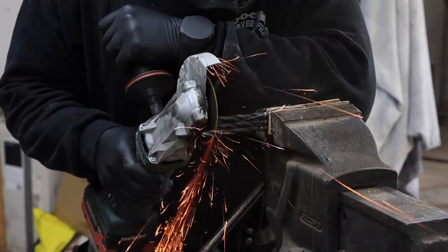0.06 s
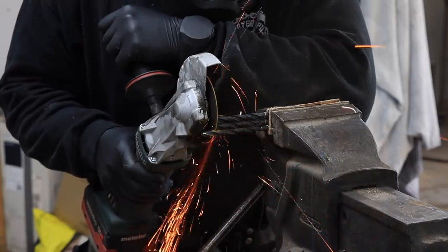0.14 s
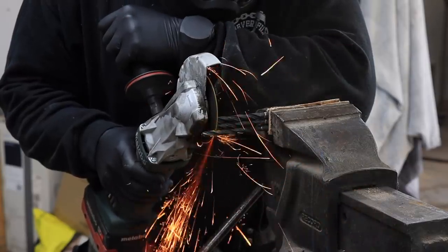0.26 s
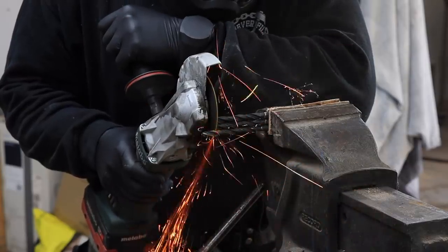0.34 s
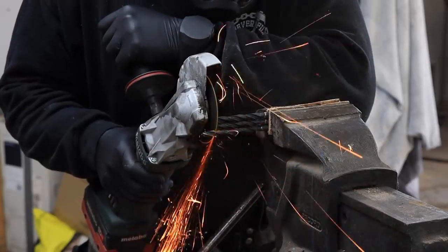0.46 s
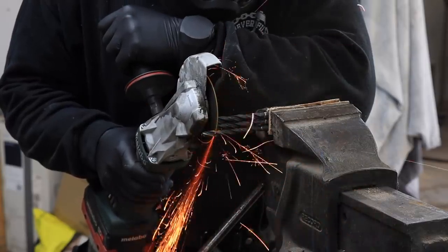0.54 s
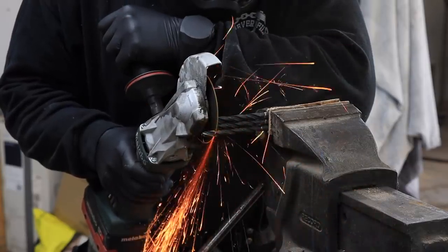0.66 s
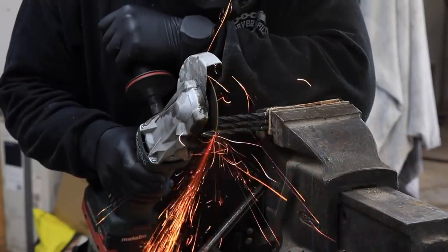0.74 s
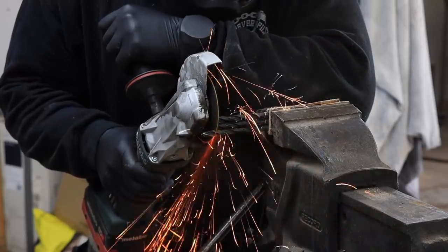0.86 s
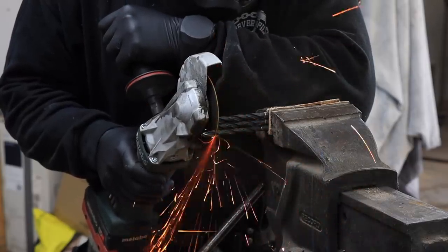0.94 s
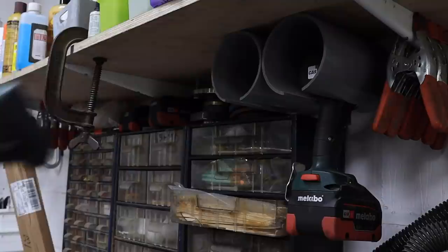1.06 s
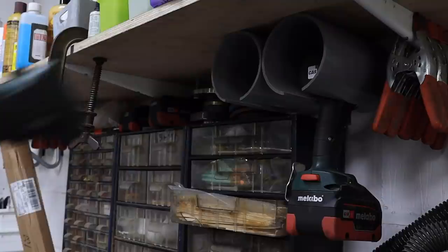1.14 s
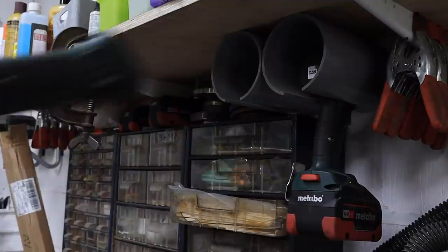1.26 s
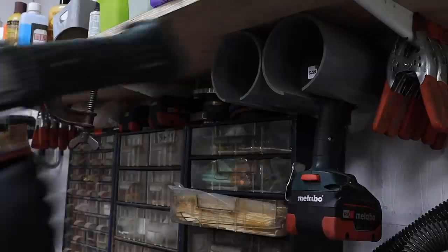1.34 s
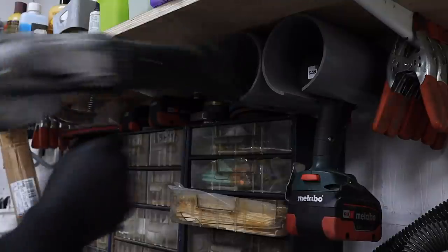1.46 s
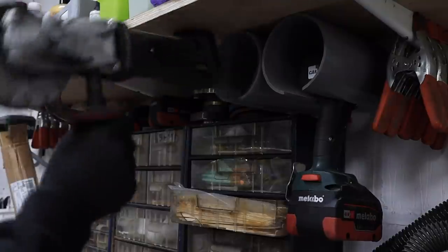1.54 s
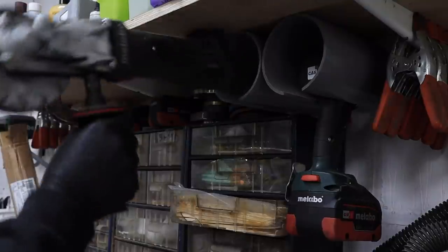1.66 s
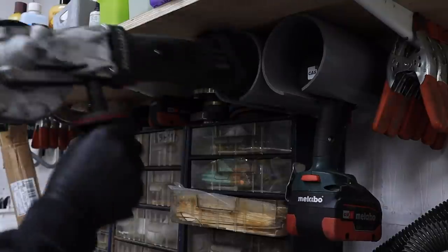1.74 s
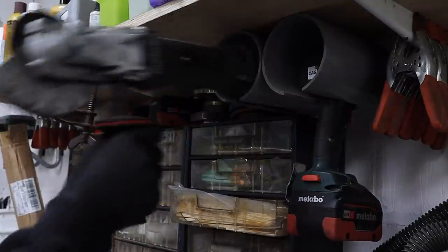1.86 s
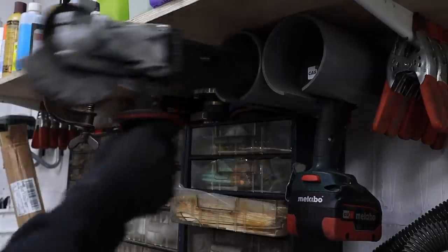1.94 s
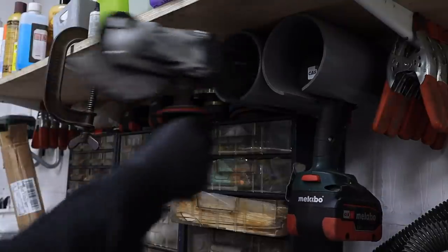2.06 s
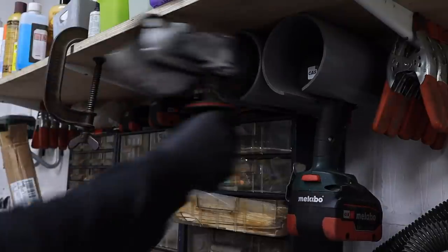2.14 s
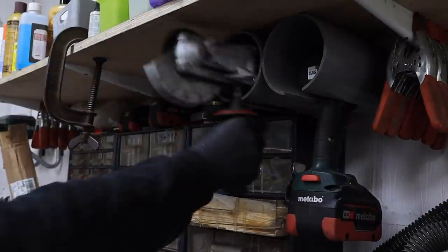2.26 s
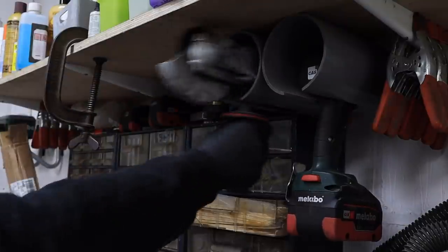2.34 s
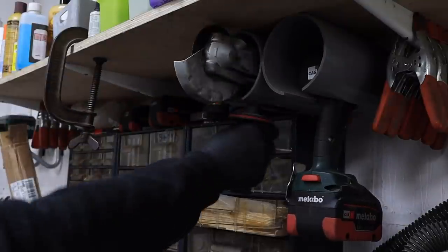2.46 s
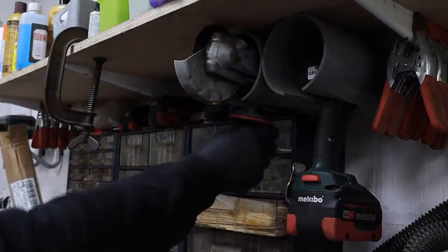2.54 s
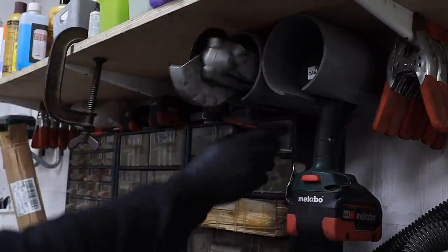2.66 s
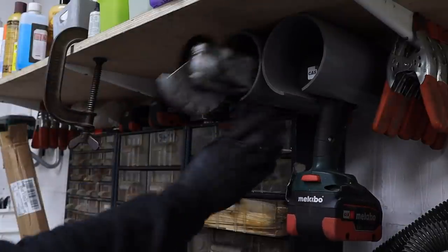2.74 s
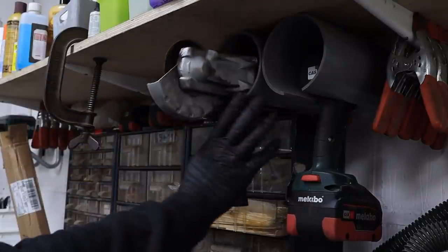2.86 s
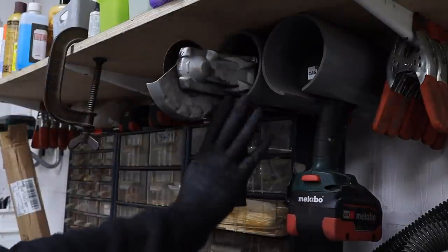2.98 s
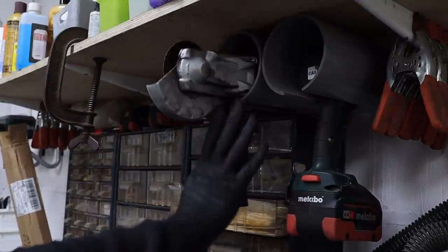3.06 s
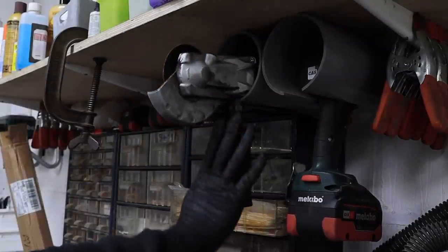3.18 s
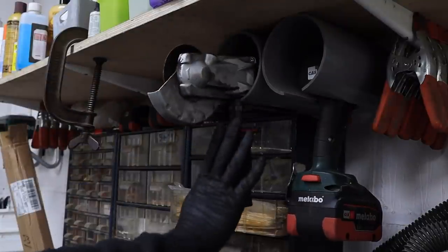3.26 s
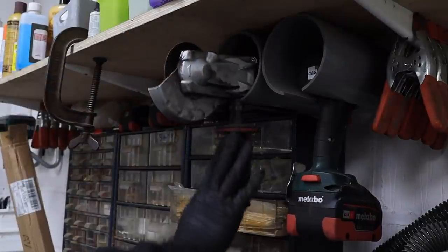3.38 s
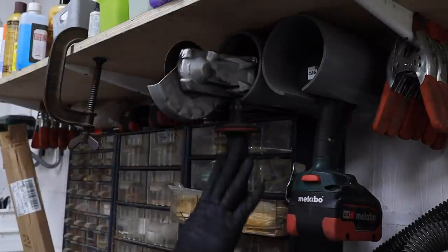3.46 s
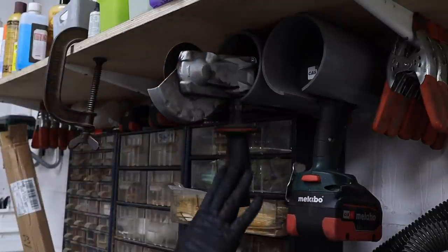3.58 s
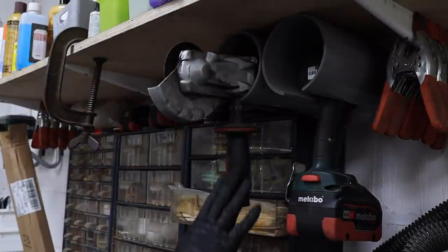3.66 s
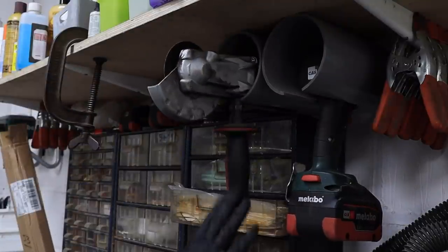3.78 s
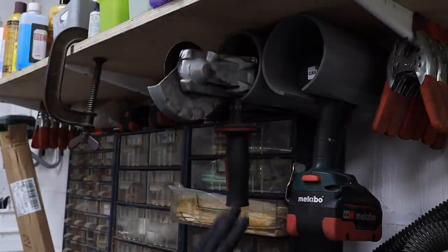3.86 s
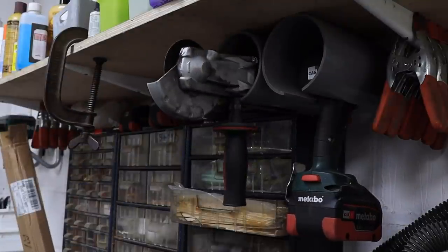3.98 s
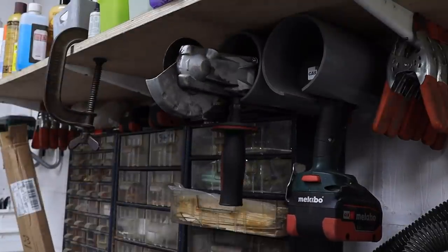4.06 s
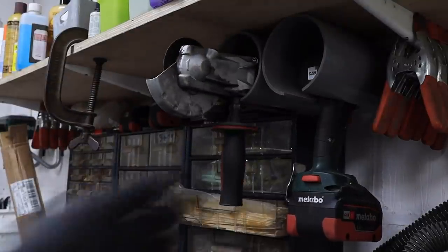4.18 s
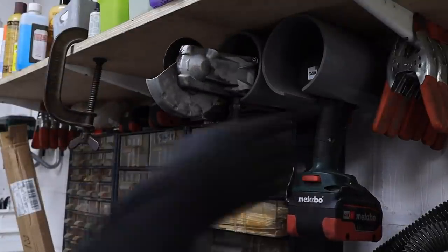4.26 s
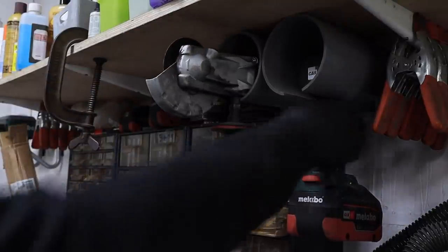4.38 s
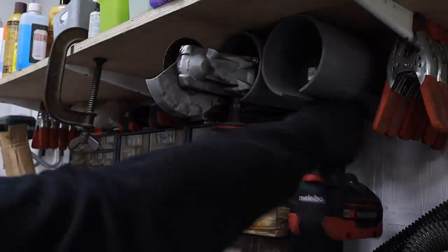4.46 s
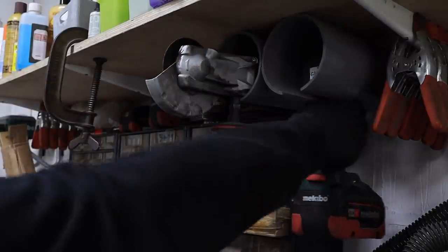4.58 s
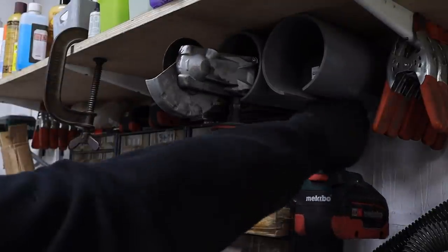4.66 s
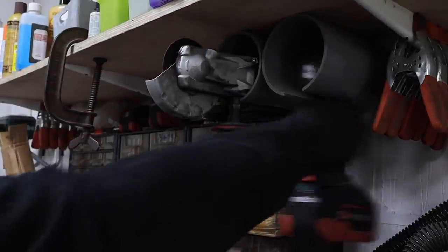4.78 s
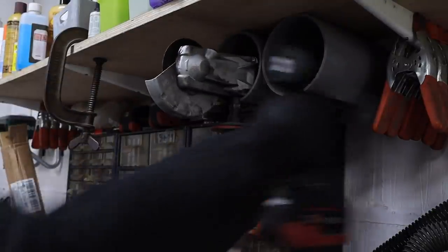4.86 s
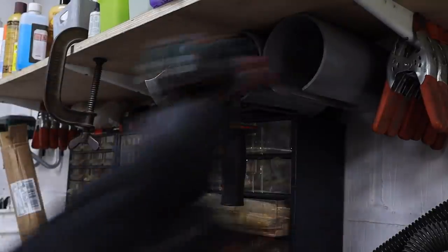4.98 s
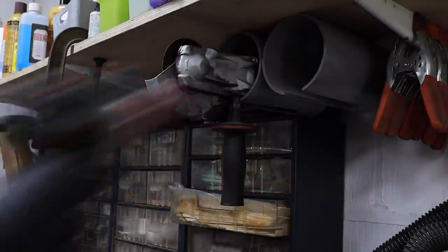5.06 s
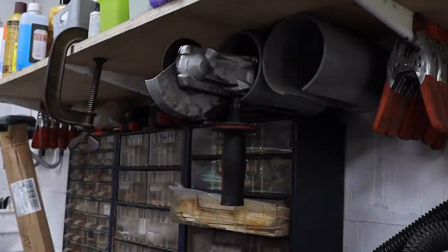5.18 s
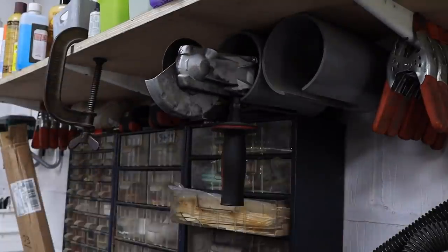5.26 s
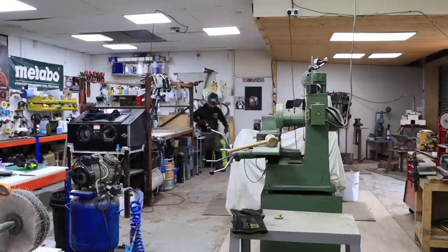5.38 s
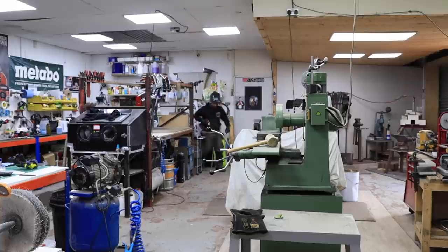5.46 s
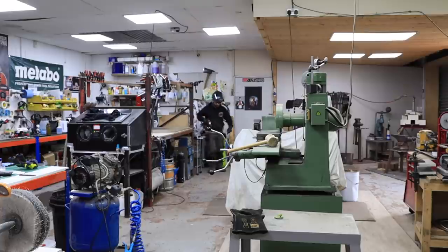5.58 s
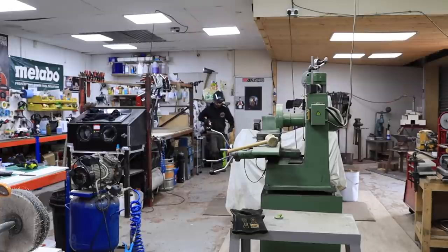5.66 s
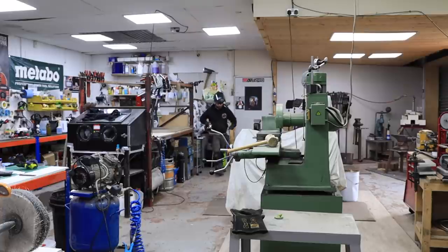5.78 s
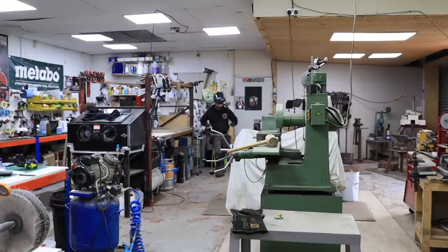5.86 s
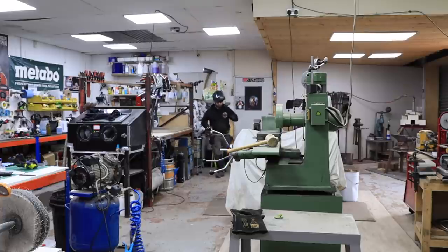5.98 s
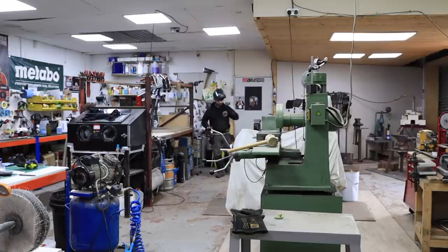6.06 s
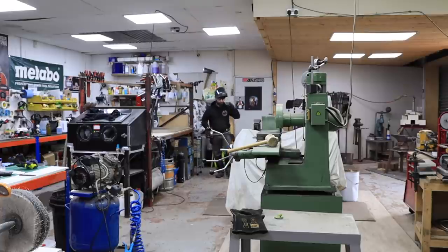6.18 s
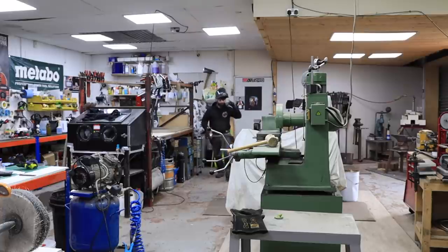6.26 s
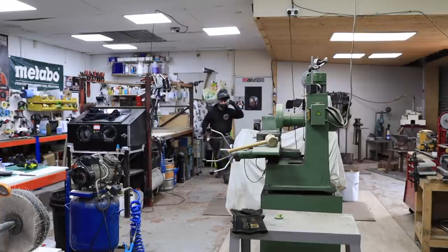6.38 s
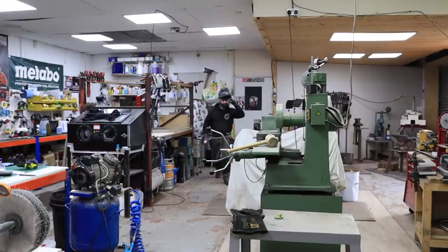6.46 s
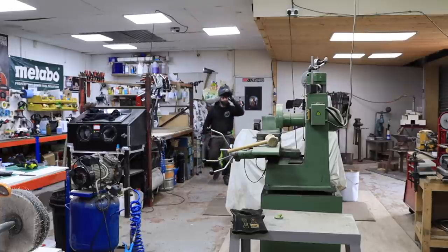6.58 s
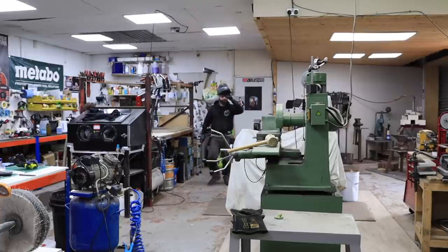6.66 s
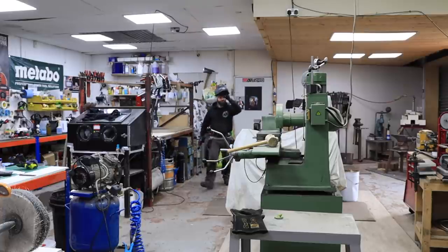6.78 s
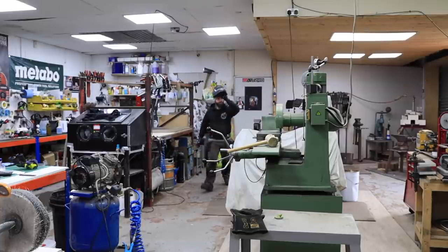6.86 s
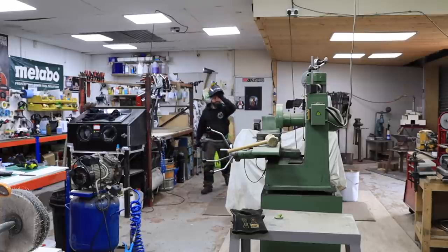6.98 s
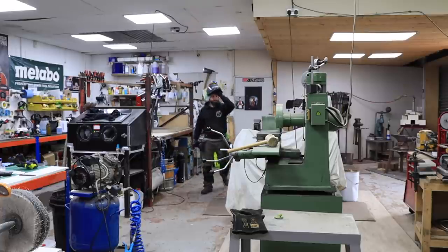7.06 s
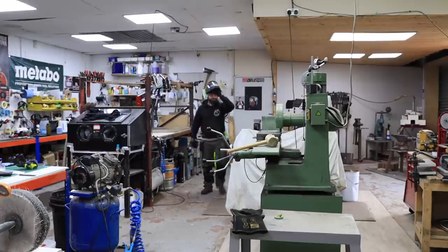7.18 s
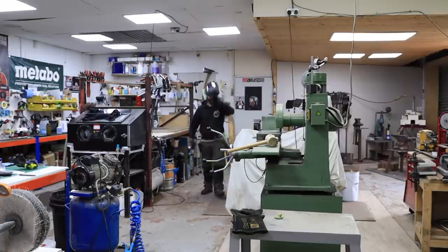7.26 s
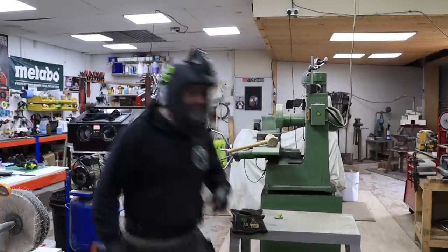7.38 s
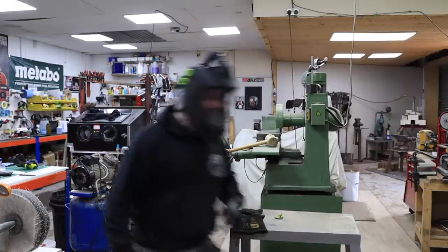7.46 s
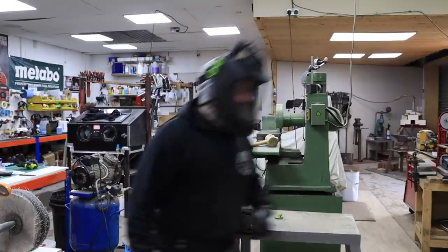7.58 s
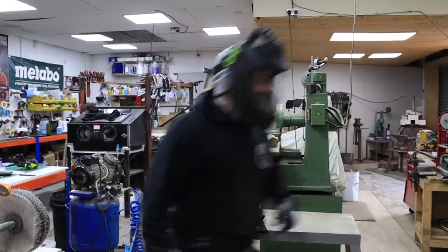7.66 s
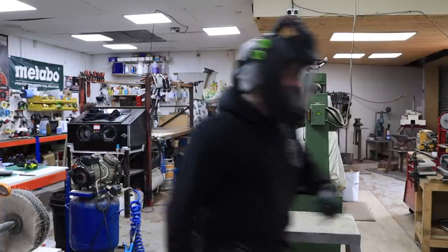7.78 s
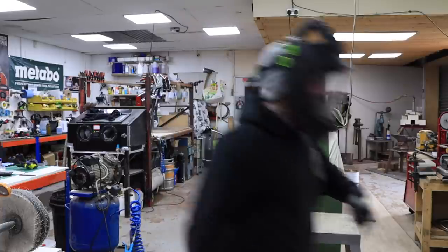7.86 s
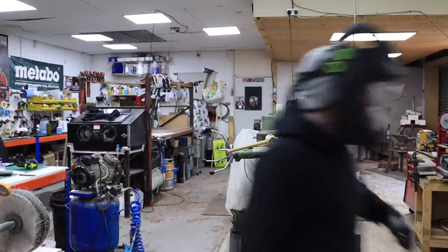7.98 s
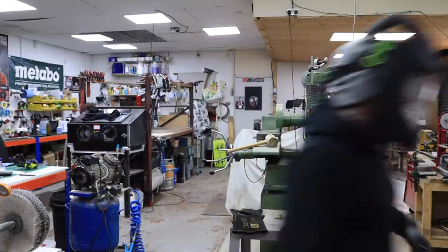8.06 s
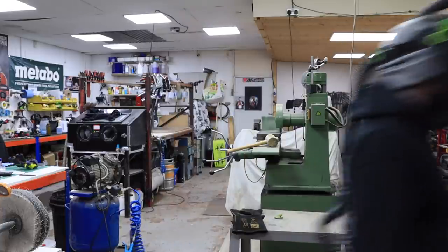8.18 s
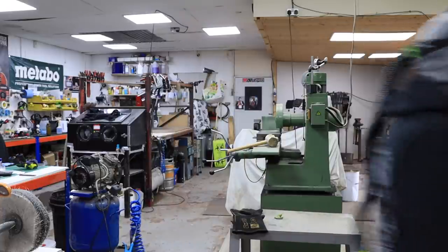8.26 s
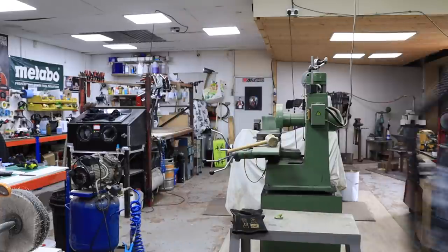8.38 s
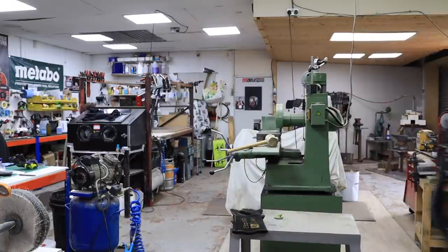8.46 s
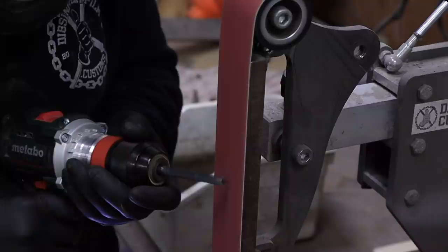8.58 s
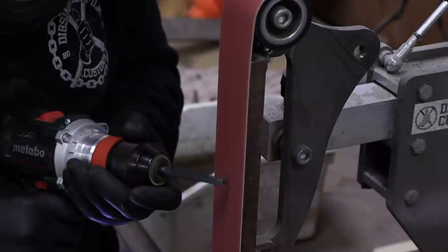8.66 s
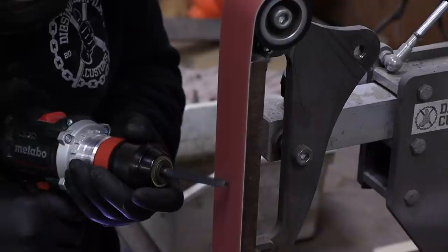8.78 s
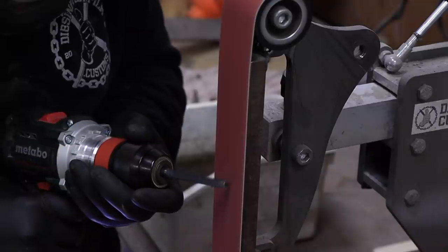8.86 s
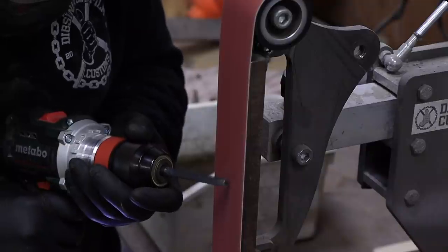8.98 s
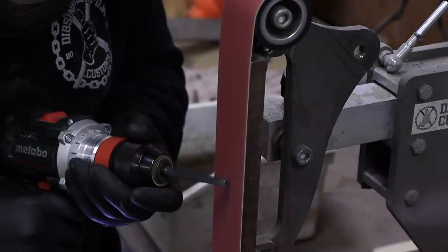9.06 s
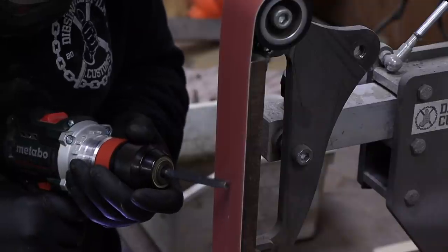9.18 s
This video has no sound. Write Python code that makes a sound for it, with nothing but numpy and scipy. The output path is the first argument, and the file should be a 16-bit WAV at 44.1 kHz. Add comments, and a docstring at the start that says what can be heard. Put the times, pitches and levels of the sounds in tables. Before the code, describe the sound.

Harsh metal cutting, abrupt cut to tools clattering into hollow plastic holsters, soft steps in a quiet workshop, then sudden belt grinder roar and buzzing contact.

```python
"""A cordless angle grinder cuts a steel bar: noise that repeats with each turn is filtered, over gear tones.
The cut ends abruptly; the tool is shoved into a plastic pipe holster under a shelf and a drill is knocked
about and pulled from the next one: noise bursts and scrapes, with decaying pipe and shelf modes.
Someone crosses the quiet workshop: shaped noise for cloth and shoes, sine modes for metal clinks.
A belt grinder then starts abruptly, steady noise and whines, and a drill bit chatters against the belt."""
import sys
import numpy as np
from scipy import signal
from scipy.fft import rfft, irfft
from scipy.io import wavfile
from scipy.ndimage import uniform_filter1d, map_coordinates

SR = 44100
rng = np.random.default_rng(int(sys.argv[2]) if len(sys.argv) > 2 else 0)


def wav_out(sig):
    """Save sig, one row per channel (or a flat mono array), as 16-bit PCM at SR to the path in sys.argv[1]."""
    wavfile.write(sys.argv[1], SR, np.round(np.clip(np.atleast_2d(sig).T, -1, 1) * 32767).astype(np.int16))


N = 406602
T = np.arange(N) / SR

CUT_END_S, BELT_START_S, TOUCH_S = 1.094, 8.612, 8.826

# modes of pipe and shelf: (frequency [Hz], relative level [dB], decay time t60 [s])
HOLSTER_MODES = [(188, -6.5, 0.3), (208, -4, 0.48), (247.4, -4, 0.24), (291.7, -2.5, 0.1),
                 (401, -5.5, 0.22), (445, -3.5, 0.22), (561, -7.5, 0.035), (621, -4, .25),
                 (780, -4.5, 0.095), (950, -3.5, 0.13), (1280, -5.5, 0.22), (1575, -3.5, 0.11),
                 (2060, -7.5, 0.13), (2365, -11.5, 0.15), (3360, -7, .08), (3725, -6.5, .07)]


def undb(db):
    """Level definition: decibels become an amplitude gain."""
    return 10 ** (np.asarray(db) / 20)


def unit(x):
    """Power normalisation: scale to rms 1."""
    return x / np.sqrt(np.mean(x ** 2))


def noise():
    """White noise: equal mean power at all frequencies."""
    return rng.standard_normal(N)


def curve(table):
    """Linear interpolation of (time, value) points."""
    s, value = np.transpose(table)
    return np.interp(T, s, value)


def during(start, end, fade):
    """Linear gating: 1 between two moments, with straight fades inside."""
    return np.clip(np.minimum(T - start, end - T) / fade, 0, 1)


def walk(rate):
    """Low-pass random fluctuation with a spread near 1."""
    k = int(SR / rate)
    held = np.repeat(rng.standard_normal(N // k + 1), k)
    return 1.2 * uniform_filter1d(held, k)[:N]


def colour(x, spectrum):
    """Minimum-phase filtering through (Hz, dB) points; white noise keeps its power."""
    size = 4096
    hz, db = np.transpose(spectrum)
    bins_hz = np.arange(size // 2 + 1) * SR / size
    gain = unit(undb(np.interp(np.log(bins_hz + 1), np.log(hz), db)))
    # folding the cepstrum onto positive times makes the filter causal
    cepstrum = irfft(np.log(gain))
    cepstrum[1:size // 2] *= 2
    cepstrum[size // 2 + 1:] = 0
    impulse_response = irfft(np.exp(rfft(cepstrum)))
    return signal.oaconvolve(x, impulse_response)[:len(x)]


def band(x, lo_hz, hi_hz, order=2):
    """Butterworth band-pass; order 1 is a single resonance."""
    edges_hz = [max(lo_hz, 10), min(hi_hz, SR / 2.1)]
    sos = signal.butter(order, edges_hz, "band", fs=SR, output="sos")
    return signal.sosfilt(sos, x + 1e-18)


def resonate(x, peaks):
    """Parallel resonances (Hz, width Hz, dB) driven by one source, at rms 1."""
    return unit(sum(undb(db) * band(x, hz - width / 2, hz + width / 2, order=1) for hz, width, db in peaks))


def ring(modes):
    """Modal impulse response: (Hz, dB, t60) sines of random polarity that decay exponentially."""
    t = T[:SR]
    return sum(undb(db - 60 * t / t60) * np.sin(2 * np.pi * hz * t) * rng.choice([-1, 1])
               for hz, db, t60 in modes)


def struck(taps, modes):
    """Impulse excitation: clean (s, dB) taps set an object's modes ringing."""
    hits = np.zeros(N)
    for s, db in taps:
        hits[int(s * SR)] = undb(db)
    return signal.oaconvolve(hits, ring(modes))[:N]


def bursts(times, dbs, t60, contact_s=.005, attack_s=0.00083):
    """Rough contact: noise starts fast, holds while the parts touch, then decays exponentially."""
    power = np.zeros(N)
    t = T[:SR // 2]
    shape = np.minimum(t / attack_s, 1) ** 2 * undb(-60 * np.maximum(t - contact_s, 0) / t60)
    for s, db in zip(times, dbs):
        part = power[int(s * SR):][:len(t)]
        part += (undb(db) * shape[:len(part)]) ** 2
    return np.sqrt(power) * noise()


def grains(rate, spread_db):
    """Granular friction: dense random clicks of very unequal size, at rms 1."""
    present = rng.random(N) < rate / SR
    size_db = spread_db * np.minimum(rng.exponential(size=N), 5)
    return unit(noise() * present * undb(size_db))


def strokes(table, edge_s=0.0094):
    """Envelope of short rubs (s, length, dB, fade dB), each changing linearly in dB."""
    return sum(undb(db - fade_db * np.clip((T - s) / length, 0, 1)) * during(s, s + length, edge_s)
               for s, length, db, fade_db in table)


def swells(table, rise, depth_db):
    """Envelope of movements (s, length, dB): exponential growth and decay, added in power."""
    power = 0
    for s, length, db in table:
        distance = np.maximum((s - T) / rise, T - s) / length
        power = power + undb(db - depth_db * np.minimum(distance, 10)) ** 2
    return np.sqrt(power)


def wheel_face(turns, keep, count=448):
    """Quasi-periodic excitation: the same grains pass each turn, while a share wears away."""
    fresh = rng.standard_normal((int(turns[-1]) + 22, count))
    face = signal.lfilter([1], [1, -keep], fresh, axis=0)
    return unit(map_coordinates(face.ravel(), [(turns + 20) * count], order=3))


def gear_whine(turns, load):
    """Harmonics of rotation: gear and fan tones keep whole multiples of the wheel speed."""
    # (multiple of wheel speed, unloaded level [dB], change at full load [dB])
    gears = [(5, -42, -10), (11, -38.5, -3), (12, -40, -12), (25, -32.5, -5), (26, -37, -3), (27, -45, 11),
             (30, -36, -8), (31, -32, -2), (32, -34.5, -4), (36, -27, -9), (37, -29.5, -9), (39, -31, -12),
             (40, -39, 9), (41, -34, 7), (42, -34.5, -1), (48, -48, 13), (49, -33.5, -13), (51, -38, -6),
             (53, -37, -9)]
    whine = 0
    for multiple, db, load_db in gears:
        gain = undb(db + load_db * load + 3.1 * walk(24)) * np.sqrt(2)
        whine = whine + gain * np.sin(2 * np.pi * (multiple * turns + rng.random()))
    return whine


def angle_grinder():
    """Abrasive excitation: grains scratch the bar, steel and guard resonate, and gears sag under load."""
    # rotation: (time [s], wheel speed [turns per s])
    wheel_speed = [(0.0, 97.5), (0.18, 97.5), (0.424, 96.6), (0.682, 93.9), (0.83, 92.7), (1.058, 94.5),
                   (1.08, 94.2)]
    # how hard the wheel is fed into the bar: (time [s], level [dB])
    feed = [(0, 1), (.22, -0.8), (.38, 1), (.7, -1.5), (.88, -0.2), (1.04, 0)]
    # ringing steel: (frequency [Hz], relative spectral density [dB])
    steel_spectrum = [(100, -47), (200, -31), (300, -28.5), (450, -22), (600, -21), (880, -19),
                      (1080, -8.5), (1400, -17), (2000, -9), (2750, -11), (3530, 1), (4000, -2.5),
                      (4300, -10), (5000, -10), (6500, -28.5), (8500, -55.5)]
    # guard resonances: (frequency [Hz], width [Hz], relative level [dB])
    guard_peaks = [(1056, 40, -10.5), (2457, 51, 0.5), (3000, 53, -4), (3550, 100, -4), (3646, 43, -8),
                   (4960, 23, -2.5), (4860, 20, -11)]
    # wheel's side in the slot: (frequency [Hz], relative spectral density [dB])
    rasp_spectrum = [(1060, -41), (1800, -20.5), (2500, -13), (2680, -8), (2820, -6.5), (3100, -3.5),
                     (3300, -3.5), (3600, -4.5), (4420, -27), (7480, -120)]
    # grit hiss: (frequency [Hz], relative spectral density [dB])
    grit_spectrum = [(4000, -32), (5500, -2), (6200, -7), (7800, -3), (8700, -10.5), (9300, -6.5),
                     (9900, 3), (11300, -4.5), (12400, 3), (12900, -3.5), (13500, 1), (14400, -1),
                     (15200, -0.5), (15800, -6)]
    # levels at a feed of 0 dB; dB of hiss per dB of feed
    base_steel_db, base_grit_db, grit_per_feed = -17.5, -21.5, 0.8
    # the side of the wheel always rubs, and binds once as the slot deepens
    rub_db, bind_db, bind_s, bind_width_s = -31, -16, 0.97, 0.044
    # the wheel is eased off: the hiss falls most, the steel rings on
    lift_s, lift_length_s, lift_grit_db, lift_steel_db = 1.054, .022, -12, -5

    speed = curve(wheel_speed)
    load = (speed.max() - speed) / np.ptp(speed)  # 0 at full speed, 1 when slowest
    turns = np.cumsum(speed * (1 + 0.00077 * walk(30))) / SR
    feed_db = curve(feed)
    lift = np.clip((T - lift_s) / lift_length_s, 0, 1)
    steel_db = base_steel_db + feed_db + lift_steel_db * lift
    grit_db = base_grit_db + grit_per_feed * feed_db + lift_grit_db * lift
    binding = undb(rub_db) + undb(bind_db) * np.exp(-((T - bind_s) / bind_width_s) ** 2)
    runout = np.cos(2 * np.pi * turns)

    def scratch(keep, loose_db, throb_db):
        """Amplitude modulation by runout: grains fixed in the wheel plus chips that break loose."""
        contact = wheel_face(turns, keep) + undb(loose_db) * grains(9000, 0.71)
        return contact * undb(throb_db * runout + .8 * walk(70))

    steel = unit(colour(scratch(keep=.9, loose_db=-2.0, throb_db=-0.5), steel_spectrum))
    guard = undb(-9) * resonate(scratch(keep=.8, loose_db=-3, throb_db=-3.0), guard_peaks)
    rasp = unit(colour(scratch(keep=.85, loose_db=-5, throb_db=0.5), rasp_spectrum))
    hiss = unit(colour(scratch(keep=.85, loose_db=0, throb_db=1.5), grit_spectrum))
    cut = (steel + guard) * undb(steel_db) + rasp * binding + hiss * undb(grit_db)
    return (cut + gear_whine(turns, load)) * during(-1, CUT_END_S, .002)


def running_belt():
    """Broadband friction noise with tones: belt and wheels rush while motor and idlers whine."""
    # rushing belt: (frequency [Hz], relative spectral density [dB])
    belt_spectrum = [(29, -51), (50, -30), (134, -19), (257, -5.5), (426, -15), (493, -7), (583, -13),
                     (742, -7.5), (991, -12), (1900, -1.5), (2300, -6), (3550, 0.5), (6330, -19.5),
                     (8050, -20.5), (15800, -26)]
    # motor and idler wheels: (frequency [Hz], level [dB])
    belt_tones = [(263.8, -45), (489.9, -43.5), (1217, -47), (1954, -42), (3133, -41), (3235, -55),
                  (3472, -40), (3558, -38), (3957, -41), (4387, -54), (4727, -51), (6632, -49),
                  (8290, -44.5)]
    belt_db = -23.5
    rush = unit(colour(noise(), belt_spectrum)) * undb(belt_db + 0.51 * walk(40))
    whine = 0
    for hz, db in belt_tones:
        phase = 2 * np.pi * hz * np.cumsum(1 + 0.00124 * walk(40)) / SR
        whine = whine + undb(db + .8 * walk(5.5)) * np.sqrt(2) * np.sin(phase)
    return (rush + whine) * during(BELT_START_S, 10, 0.0009)


def bit_on_belt():
    """Chatter as amplitude modulation: the bit bounces against the belt as it is pressed on."""
    # pressing: (time [s], level [dB])
    press = [(8.826, -20), (8.89, -20.5), (8.96, -20), (9.03, -19.5), (9.1, -16.5), (9.22, -14)]
    # grinding bit: (frequency [Hz], relative spectral density [dB])
    bit_spectrum = [(300, -9.5), (1000, -7.5), (2200, -7), (3400, 1), (4600, 5), (6500, -9), (8500, -15),
                    (10500, -11.5), (14000, -13.5), (15800, -19)]
    chatter_hz = 65.2
    bounce = np.cos(2 * np.pi * chatter_hz * (T - TOUCH_S - .003))
    bite = unit(colour(grains(14000, 1.8), bit_spectrum))
    # the hiss follows every bounce; the ringing steel smooths them over
    hiss = band(bite, 5500, 18000) * undb(5 * bounce - 1.5)
    steel = band(bite, 160, 3760) * undb(1.4 * bounce)
    return (steel + hiss) * undb(curve(press)) * during(TOUCH_S, 10, 0.0027)


def knocks():
    """Impact and modal response: blows tick, clack, thump and boom, and ring the pipe and shelf."""
    # blows: (time [s], clack level [dB], thump over clack [dB], tick over clack [dB])
    blow_table = [(1.524, -10, -6.5, -14), (1.559, -7.5, -4.5, -6), (1.635, -24.5, 3, -25),
                  (1.818, -37.5, 7, -22), (1.876, -28, -1, -15.5), (1.914, -32.5, 4.5, -19),
                  (2.186, -47, 3, -15.5), (2.204, -32.5, 2, -21), (2.22, -27, 8, -18),
                  (2.288, -14.5, -1.5, -7.5), (2.336, -23, -4.5, -18), (2.431, -21, -9, -25),
                  (2.449, -29, -15, -20), (2.464, -32.5, -5, -30), (2.561, -45.5, -5, -25),
                  (2.633, -35.5, -7, -6), (2.699, -42, 4.5, -20), (2.749, -32.5, 1, -10.5),
                  (2.829, -25.5, -4.5, -17), (2.919, -42, -0.5, -26), (3.24, -47, 2.5, -13),
                  (3.419, -59.5, 3.5, -4.5), (4.462, -52.5, -7.5, -3), (4.474, -40.5, -13, -6),
                  (4.495, -27, -0.5, -18), (4.514, -34.5, -3, -10.5), (4.577, -51, 10.5, -5),
                  (4.772, -39, -7, -15), (4.784, -33, -3.5, -12.5), (4.954, -11.5, -13, -9.5),
                  (4.97, -13, -9, -11)]
    # blow colour: (frequency [Hz], relative spectral density [dB])
    clack_spectrum = [(35, -49.5), (60, -12.5), (425, 3), (700, 1), (919, -3.5), (1160, -6.5), (1270, -6.5),
                      (2030, -7.5), (2230, -7.5), (2950, -8.5), (3240, -4), (4180, -11), (4810, -21.5),
                      (12200, -33.5), (15800, -34.5)]
    # t60 is the clack's; lower registers last longer
    blow_attack_s, blow_contact_s, blow_t60_s = 0.0011, .0042, .047
    # a tick is the first hard touch of a blow; its gain adds to every tick
    tick_attack_s, tick_contact_s, tick_t60_s, tick_gain_db = .0015, 0.0015, 0.032, 3.5
    # boom under a 0 dB thump; the yielding shelf follows it less than dB for dB
    boom_db, boom_per_thump = -15, .75
    s, clack_db, weight_db, edge_db = np.transpose(blow_table)
    thump_db = clack_db + weight_db
    reference = colour(noise(), clack_spectrum)

    def register(dbs, t60, lo_hz, hi_hz, contact_s=blow_contact_s, attack_s=blow_attack_s):
        """Band-limited impact noise, normalised by the power of steady noise in its band."""
        blows = colour(bursts(s, dbs, t60, contact_s, attack_s), clack_spectrum)
        return band(blows, lo_hz, hi_hz, order=3) / np.std(band(reference, lo_hz, hi_hz, order=3))

    boom = register(boom_db + boom_per_thump * thump_db, 4 * blow_t60_s, 70, 300)
    thump = register(thump_db, 2.4 * blow_t60_s, 250, 900)
    clack = register(clack_db, blow_t60_s, 900, 4100)
    tick_db = clack_db + edge_db + tick_gain_db
    tick = register(tick_db, tick_t60_s, 4600, 14000, tick_contact_s, tick_attack_s)
    body = signal.oaconvolve(boom + thump + clack, ring(HOLSTER_MODES))[:N]
    return boom + thump + clack + tick + undb(-59) * body


def judders():
    """Stick-slip friction: quick uneven slips in the pipe ring its wall and the wheel guard."""
    # slips: (time [s], length [s], level before the band-pass [dB], fade over the length [dB])
    judder_strokes = [(2.21, 0.1, -30, -0.5), (2.43, 0.057, -24.5, 4), (2.745, 0.046, -37, 6),
                      (4.885, 0.1, -37.5, 0)]
    # wall and guard: (frequency [Hz], width [Hz], relative level [dB])
    judder_peaks = [(543, 24, 9.5), (1090, 150, -11), (1910, 120, -13), (2880, 127, -4), (3633, 140, 0.5),
                    (3624, 120, -6)]
    slips = resonate(grains(2000, 2), judder_peaks)
    return band(slips, 510, 3120, order=3) * strokes(judder_strokes)


def slides():
    """Sliding friction: dull rubbing, a gritty scrape and the fine hiss of plastic on plastic."""
    # slides: (time [s], length [s], rumble level [dB], scrape level [dB], fade over the length [dB])
    slide_table = [(1.647, .3, -31.5, -41, 15.5), (1.882, 0.038, -37, -42, 6), (1.954, 0.39, -52, -53, 4.5),
                   (2.2, .085, -31, -37, -2), (2.351, 0.14, -41.5, -42.5, 4), (2.668, 0.29, -51, -48, -1),
                   (2.947, 0.27, -59, -52.5, 15.5), (4.556, 0.232, -48.5, -52.5, 13),
                   (4.794, .175, -51.5, -48, -14.5)]
    # rubbing colour: (frequency [Hz], relative spectral density [dB])
    slide_spectrum = [(35, -52), (60, -20), (103, -4), (142, -21), (300, -2), (501, -15.5), (563, -8),
                      (919, -14.5), (1400, -23.5), (3390, -20.5), (4810, -29.5), (11900, -61.5),
                      (15800, -55.5)]
    # the gritty middle and fine top of a 0 dB scrape; a slide starts and stops within edge_s
    middle_db, top_db, edge_s = -6, -19.5, 0.011
    rub = unit(band(colour(grains(1200, 1.7), slide_spectrum), 150, 1200))
    hollow = unit(signal.oaconvolve(grains(1100, 2.01), ring(HOLSTER_MODES))[:N])
    scrape = unit(band(colour(grains(5500, 1.8), slide_spectrum), 1200, 16000))
    hiss = unit(band(grains(9000, 1.5), 5000, 14500, order=1))
    gritty = (undb(middle_db) * scrape + undb(top_db) * hiss) * undb(2 * walk(50))
    s, length, rumble_db, scrape_db, fade_db = np.transpose(slide_table)
    rumbling = strokes(zip(s, length, rumble_db, fade_db), edge_s)
    scraping = strokes(zip(s, length, scrape_db, fade_db), edge_s)
    return (rub + undb(-4) * hollow) * rumbling + gritty * scraping


def shelf_booms():
    """Modal excitation: the drill bumps the shelf and makes it boom."""
    # bumps: (time [s], level [dB])
    bumps = [(4.505, -37), (4.797, -43), (4.982, -29)]
    # shelf modes: (frequency [Hz], relative level [dB], decay time t60 [s])
    shelf_modes = [(135, -6, .15), (165, -5, .15), (186, -3, .15), (212, 0, .16), (245, -7, .14),
                   (404, -7, .18), (603, -13, .16)]
    return band(struck(bumps, shelf_modes), 100, 900)


def rustling_clothes():
    """Granular friction: fibres rubbing, one swell per movement."""
    # movements: (time of the height [s], length [s], level [dB])
    rustles = [(1.25, 0.13, -71), (1.445, .06, -64.5), (4.1, 0.29, -64), (5.96, .2, -64),
               (6.215, 0.077, -63.5), (6.52, 0.27, -67), (7.0, 0.16, -66), (7.27, 0.56, -58),
               (7.53, .2, -60), (7.76, .15, -67.5), (7.965, 0.1, -60.5), (8.05, 0.15, -57.5),
               (8.57, 0.26, -62.5)]
    # cloth: (frequency [Hz], relative spectral density [dB])
    cloth_spectrum = [(180, -41), (300, -3), (403, -1.5), (480, -12), (928, -7.5), (1250, -10.5),
                      (2200, -13.5), (3120, -11), (3920, -8), (5530, -24.5), (15000, -34.5)]
    cloth = unit(colour(grains(5000, 2.1), cloth_spectrum)) * undb(1.1 * walk(35))
    # rise time as a share of the length; fall in dB over one length
    return cloth * swells(rustles, rise=0.94, depth_db=18)


def scuffs():
    """Friction-driven resonance: sleeves and shoes scuff with coloured and resonant grains."""
    # scuffs: (time [s], length [s], relative level [dB], fade over the length [dB])
    scuff_strokes = [(5.29, 0.093, -51, 8), (6.642, 0.23, -48, 20.5), (7.333, 0.075, -50, 0.5)]
    # sole: (frequency [Hz], relative spectral density [dB])
    sole_spectrum = [(240, -19), (400, 1), (493, 1), (758, -30), (842, -10), (907, 1), (1240, 6),
                     (1370, -5), (1740, 1), (2420, -4), (3900, 3.5), (5910, -33), (14000, -56)]
    # sole resonances: (frequency [Hz], width [Hz], relative level [dB])
    sole_peaks = [(830, 160, 3), (1160, 410, -15), (1610, 160, -4), (2890, 150, -2), (3450, 43, 11),
                  (3800, 260, 13)]
    grit = grains(6000, 1.1)
    rough = undb(-0.5) * unit(colour(grit, sole_spectrum))
    resonant = undb(-4.0) * band(resonate(grit, sole_peaks), 590, 7100)
    return (rough + resonant) * strokes(scuff_strokes)


def footfalls():
    """Soft impact: shoes land with short bursts of mostly low noise."""
    # footfalls: (time [s], level [dB])
    steps = [(5.89, -65), (6.43, -55.5), (6.93, -54), (7.443, -51.5), (7.96, -51), (8.041, -54.5),
             (8.47, -56.5), (8.564, -48.5)]
    # footfall: (frequency [Hz], relative spectral density [dB])
    step_spectrum = [(29, -21), (50, -9), (168, -2), (454, -14), (726, -16.5), (1050, -29), (1500, -19),
                     (1950, -51), (3300, -120)]
    return colour(bursts(*np.transpose(steps), t60=0.17, contact_s=0.0032), step_spectrum)


def dry_clicks():
    """Brief hard contact: grit underfoot and buckles click in band-limited bursts."""
    # clicks: (time [s], level before the band-pass [dB])
    clicks = [(5.9, -69.5), (5.943, -63), (5.959, -60), (7.511, -62), (8.037, -52.5), (8.32, -65),
              (8.397, -64), (8.464, -66)]
    contacts = bursts(*np.transpose(clicks), t60=0.037, contact_s=.003)
    return band(contacts, 2500, 7200, order=1)


def metal_clinks():
    """Modal ringing: taps on light metal excite a few slowly decaying sines."""
    # taps: (time [s], level [dB])
    clinks = [(7.423, -60.5), (7.513, -70)]
    # metal modes: (frequency [Hz], relative level [dB], decay time t60 [s])
    clink_modes = [(1150, 2, .55), (3480, -2, .5), (3600, 1, .5), (4270, 1, .45), (5050, -3, .55)]
    return struck(clinks, clink_modes)


def walker():
    """Superposition of the sounds of someone crossing the workshop."""
    return rustling_clothes() + scuffs() + footfalls() + dry_clicks() + metal_clinks()


def workshop_air():
    """Stationary background noise, a little stronger with a hum out on the open floor."""
    # air: (frequency [Hz], relative spectral density [dB])
    air_spectrum = [(15, -37), (25, -6.5), (102, -3), (174, -11.5), (200, -13), (307, -8), (382, -24),
                    (425, -12), (587, -11.5), (1510, -21.5), (3300, -24.5), (4950, -32.5), (15800, -39.5)]
    # hum: (centre frequency [Hz], relative level [dB])
    hum_tones = [(48.4, -88), (102.3, -72), (172.3, -77), (306.8, -71.5)]
    air_db, open_floor_db = -67, 1.7  # base level; rise on the open floor
    open_floor = during(5.38, 10, 0.018)
    hum = 0
    for hz, db in hum_tones:
        phase = 2 * np.pi * np.cumsum(hz + 1.645 * walk(15)) / SR
        hum = hum + undb(db + 2 * walk(7.1)) * np.sqrt(2) * np.sin(phase)
    air_level_db = air_db + open_floor_db * open_floor + 1.0 * walk(2.7)
    air = unit(colour(noise(), air_spectrum)) * undb(air_level_db)
    return air * during(CUT_END_S, 10, 0.0025) + undb(-1) * hum * open_floor


def room(x, wet_db, t60_low, t60_high):
    """Diffuse reverberation: convolution with decaying noise whose treble dies first."""
    t = T[:SR]
    t60_mid = np.sqrt(t60_low * t60_high)
    low = band(rng.standard_normal(SR), 100, 1000) * undb(-60 * t / t60_low)
    mid = band(rng.standard_normal(SR), 1000, 4300) * undb(-2.5 - 60 * t / t60_mid)
    high = band(rng.standard_normal(SR), 4300, 15000) * undb(-5 - 60 * t / t60_high)
    tail = (low + mid + high) * np.clip(t / 0.0043, 0, 1)
    return x + undb(wet_db) * signal.oaconvolve(x, tail)[:N]


def scene():
    """Linear superposition of all sources at one microphone."""
    reverberant = room(knocks() + judders(), wet_db=-40.5, t60_low=0.45, t60_high=0.34)
    holsters = reverberant + slides() + shelf_booms()
    belt_grinder = running_belt() + bit_on_belt()
    return (angle_grinder() + belt_grinder + holsters + walker() + workshop_air())[None]


def record(dry):
    """Clipping and band limitation: peaks stop at full scale, then an elliptic low-pass cuts the top."""
    top_hz = 15850
    low_pass = signal.ellip(10, .2, 70, top_hz, fs=SR, output="sos")
    return signal.sosfilt(low_pass, np.clip(dry, -1, 1))


dry = scene()
out = record(dry)
wav_out(out)
```